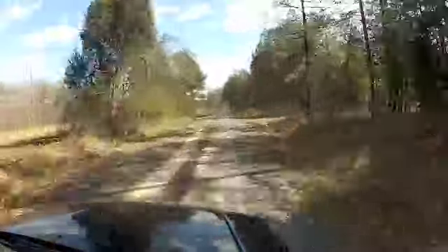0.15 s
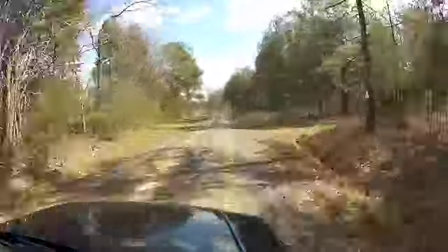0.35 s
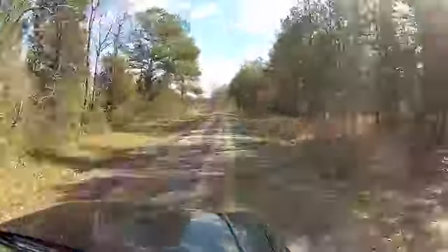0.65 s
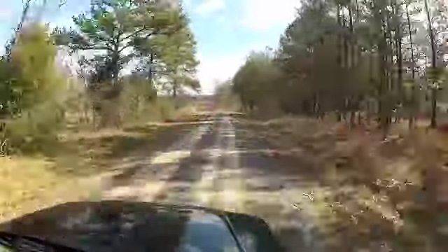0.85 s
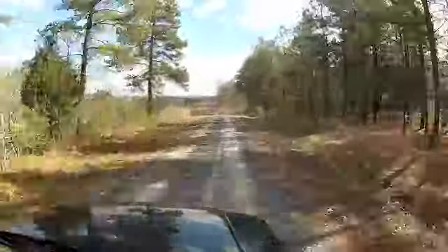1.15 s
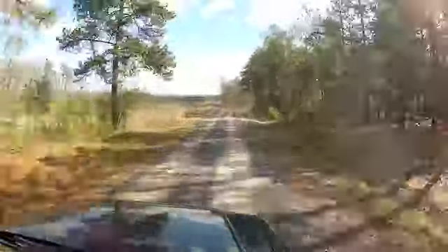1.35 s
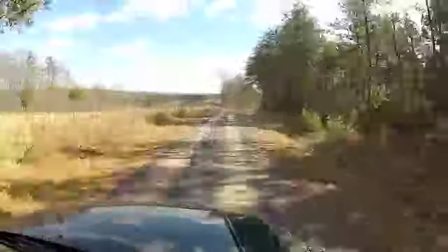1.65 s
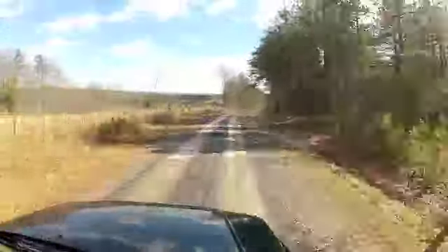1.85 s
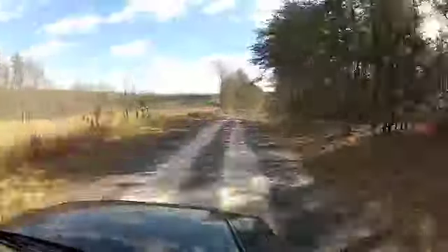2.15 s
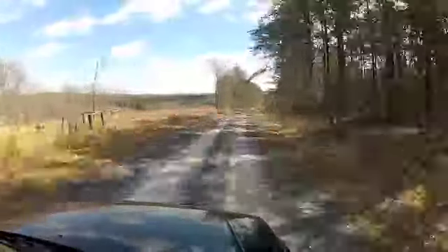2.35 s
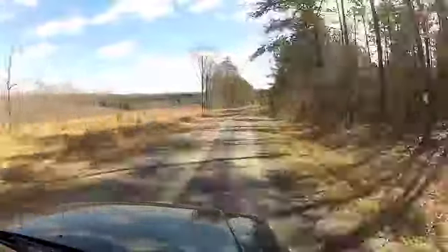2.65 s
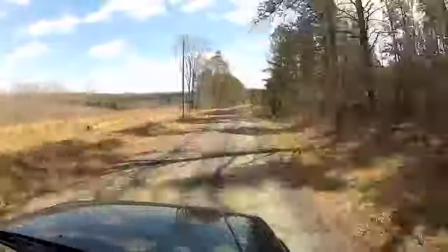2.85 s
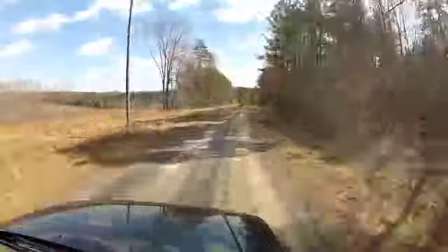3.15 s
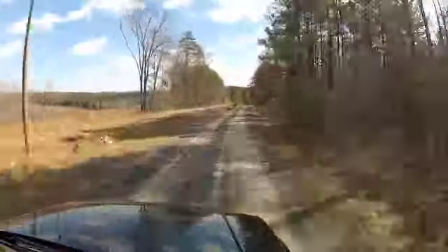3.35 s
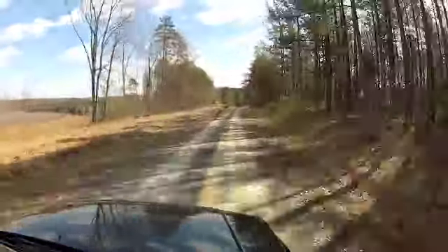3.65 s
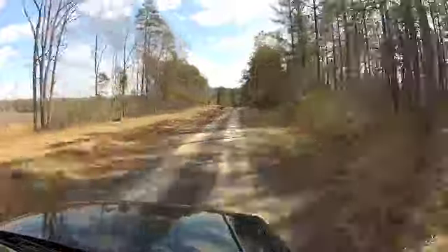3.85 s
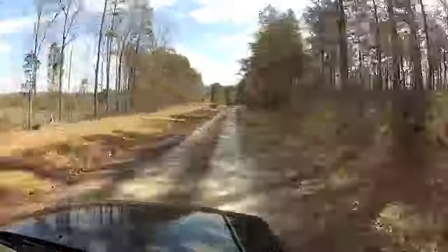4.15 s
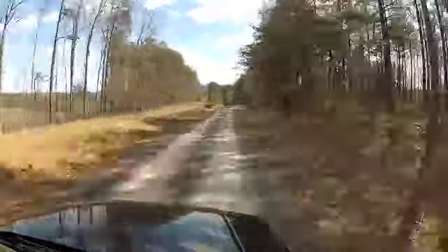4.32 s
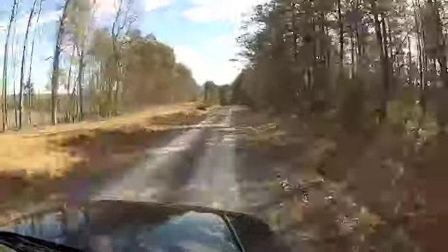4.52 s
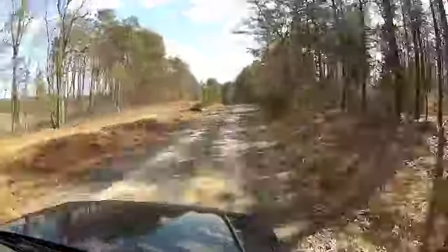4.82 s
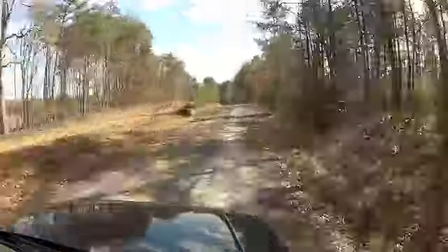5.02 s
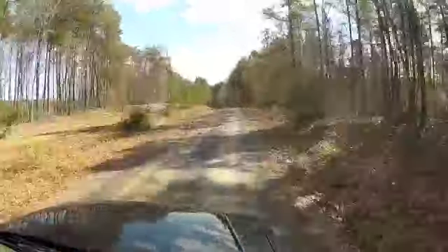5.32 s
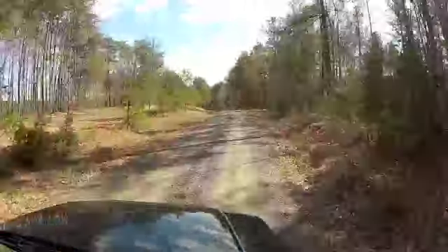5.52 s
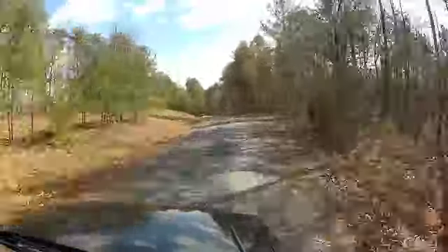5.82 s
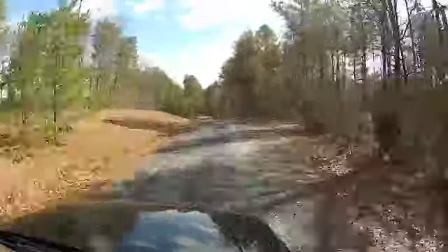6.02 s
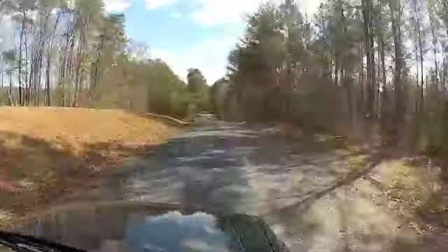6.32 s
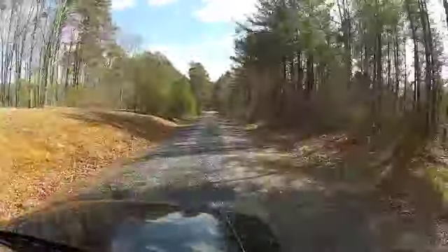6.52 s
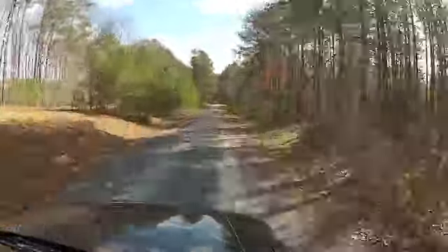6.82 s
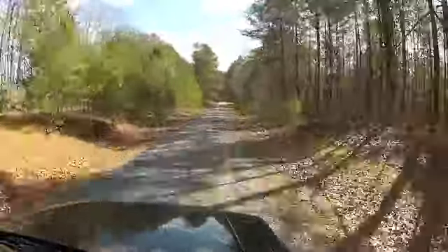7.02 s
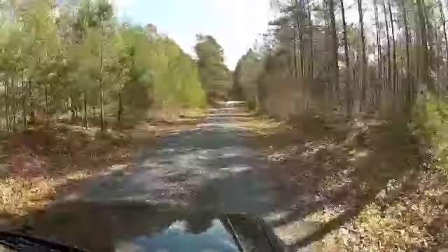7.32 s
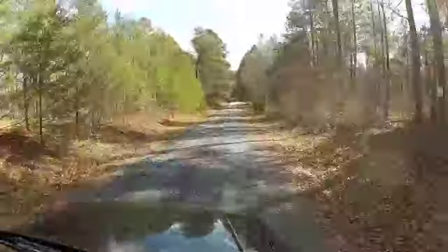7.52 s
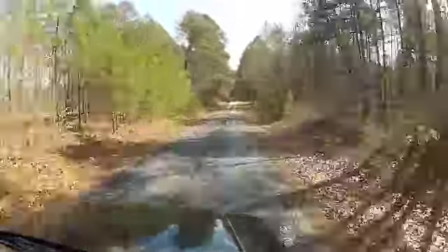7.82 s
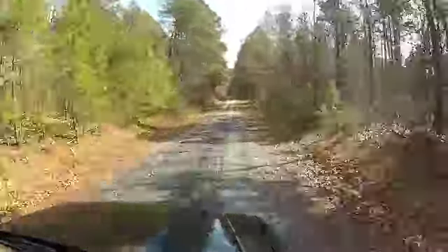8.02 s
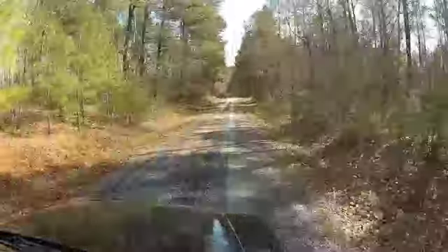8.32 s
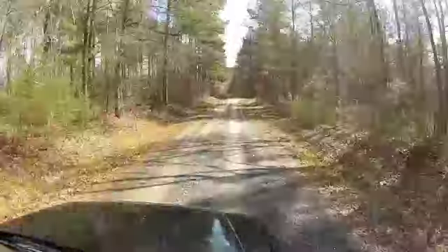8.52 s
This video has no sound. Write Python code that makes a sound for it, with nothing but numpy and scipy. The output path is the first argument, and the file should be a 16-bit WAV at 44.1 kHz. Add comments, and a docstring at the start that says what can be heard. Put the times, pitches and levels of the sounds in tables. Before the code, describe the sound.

A car drives steadily along a gravel forest road, heard by a microphone in a closed housing on its roof. Throughout, the case gives a hollow, boxy, uneven rumble, over low engine noise, a roof boom that swells and dips, a faint panel drone and tyre roar. A bright airstream hiss flutters above, with brief puffs and lulls. Around 1 s a soft jolt thumps, another near 1.7 s; fine grit ticks are clearest from 1.5 to 3 s. Duller bumps come at 3.1 and 3.6 s. At 4.4 s a stronger double thud leads into a rougher swell, easing around 5.5 s. From 5.8 s the shaking rises again and stays heavy, with bumps near 6.3 s. At about 7.6 s two jolts land, the second with a short, hard mount knock. More thuds cluster from 8.1 to 8.4 s, and the drive continues to the end at 8.7 s.

```python
"""A microphone in a closed housing rides on the roof of a car along a gravel forest road.
Throughout, band-shaped noise through resonances gives the ringing housing, booming roof, engine, panels,
tyres and hissing airstream; decaying tone bursts give the grit ticks, densest in level near 1.6 s and 3 s.
From about 1 s bumps jolt the housing, struck as sums of decaying modes, and near 7.7 s the mount knocks once."""
import sys
import numpy as np
from scipy import signal
from scipy.fft import rfft, irfft, next_fast_len
from scipy.io import wavfile
from scipy.ndimage import uniform_filter1d, map_coordinates

SR = 44100
rng = np.random.default_rng(int(sys.argv[2]) if len(sys.argv) > 2 else 0)


def master_out(mix):
    """Clip the mix to full scale and print it as 16-bit PCM to the path in sys.argv[1]."""
    frames = np.transpose(np.atleast_2d(mix))
    ceiling = np.clip(frames, -1, 1)
    pcm = np.round(ceiling * 32767).astype(np.int16)
    wavfile.write(sys.argv[1], SR, pcm)


N = 382332

# Roughness of the road as felt in the housing. Each row: time in seconds, shaking in dB.
ROAD_SHAKING = [(0, -24.5), (.5, -25.5), (.75, -19.5), (.95, -21.5), (1.2, -25.5), (1.6, -24.5),
                (2.0, -26.5), (3.05, -26.5), (3.2, -24.5), (3.55, -21), (3.8, -24.5), (4.34, -23),
                (4.4, -19.5), (4.58, -15), (4.9, -18.5), (5.25, -20), (5.52, -25), (5.75, -21),
                (5.95, -15.5), (6.5, -16), (7.0, -17), (7.45, -18.5), (7.6, -15.5), (8.2, -17.5),
                (8.67, -19)]
# Strength of the airstream. Each row: time in seconds, hiss level in dB before puffs and gusting.
WIND_STRENGTH = [(0, -37), (.4, -35.5), (.55, -41), (.8, -39), (1.0, -35), (1.2, -41.5), (1.35, -37),
                 (1.5, -39.5), (1.9, -37.5), (2.3, -40.5), (2.55, -41.5), (2.8, -39.5), (3.1, -41),
                 (3.5, -41.5), (3.78, -45), (3.86, -38.5), (4.5, -35), (4.9, -36.5), (5.1, -40.5),
                 (5.45, -41), (5.6, -44), (6.0, -40), (6.3, -41.5), (6.45, -39), (6.75, -41), (7.4, -38),
                 (8.0, -41), (8.15, -37), (8.67, -35)]
# Short puffs and lulls of the airstream. Each row: middle in seconds, length in seconds, change in dB.
WIND_PUFFS = [(.33, 0.07, 3), (.38, 0.048, -5), (.9, .04, 1), (1.19, .06, 1.5), (1.405, 0.012, -9),
              (1.45, 0.014, -9), (1.5, 0.059, -5), (1.575, .02, -4), (1.88, .08, 1.5), (2.08, .05, -2),
              (2.37, 0.032, -3), (2.425, 0.039, 3.5), (2.53, 0.099, -4.5), (2.62, 0.028, -1),
              (2.86, .04, -5.5), (2.94, 0.03, -3.5), (3.14, 0.038, -9), (3.3, 0.048, -8), (3.49, .07, 4),
              (3.67, .06, -5), (3.8, 0.046, -1.5), (5.48, 0.12, 3), (5.53, 0.047, -3), (5.62, 0.067, -3),
              (5.89, 0.09, -3), (6.33, 0.097, -4), (6.67, 0.058, 2.5), (6.76, 0.061, 4.5), (7.48, 0.027, 4),
              (8.05, 0.043, -3)]
# Modes of the housing walls. Each row: centre in Hz, width in Hz, relative level in dB.
WALL_MODES = [(367.7, 54, 3), (446, 50, 2), (527, 58, -5.5), (579, 82, -8), (683, 80, -13)]
# Mode of the housing lid. Each row: centre in Hz, width in Hz, relative level in dB.
LID_MODES = [(484.1, 27, 0)]
# Middle modes of the microphone port. Each row: centre in Hz, width in Hz, relative level in dB.
SPRAY_MODES = [(7010, 660, 0), (8630, 930, -1.5), (9970, 1100, -6)]
# Spectrum of what drives the housing. Each row: frequency in Hz, level in dB.
ROAD_SPECTRUM = [(100, -47), (220, -7), (550, -1.5), (750, -10.5), (1000, -27), (2000, -67)]

REFERENCE_SHAKE_DB, REFERENCE_HISS_DB = -21, -39
# dB at reference hiss, dB per dB of hiss, per dB of puff or lull, per dB of brightness
SPRAY_LAW = (-44, 1.2, 1.16, 0.85)


def amp(db):
    """Logarithmic level: 20 dB is a factor of ten in amplitude."""
    return 10 ** (np.asarray(db) / 20)


def unit(x):
    """Root-mean-square normalization: the signal is scaled to rms 1."""
    return x / np.sqrt(np.mean(x ** 2) + 1e-20)


def along(points, hz):
    """Spectral envelope: gain from (Hz, dB) points joined on a logarithmic frequency axis."""
    point_hz, point_db = np.transpose(points)
    return amp(np.interp(np.log(hz + 1), np.log(point_hz + 1), point_db))


def curves(rows):
    """Linear interpolation in time: one value per sample for each column after the time."""
    seconds, *columns = np.transpose(rows)
    return [np.interp(np.arange(N) / SR, seconds, column) for column in columns]


def wobble(rate):
    """Band-limited random modulation: a smooth curve through `rate` random knots a second."""
    knots = rng.standard_normal(int(N * rate / SR) + 4)
    return map_coordinates(knots, [np.arange(N) * rate / SR])


def filtered(x, response):
    """Linear filtering: the spectrum of x is multiplied by a response of frequency."""
    m = next_fast_len(N + SR // 2)
    return irfft(rfft(x, m) * response(np.fft.rfftfreq(m, 1 / SR)), m)[..., :N]


def ringing(modes, hz, steep):
    """Incoherent superposition: powers of resonances add; steep > 1 darkens the valleys between them."""
    power = 0
    for centre, width, db in modes:
        resonance = np.abs(hz * width / (centre * centre - hz * hz + 1j * hz * width))
        power = power + (amp(db) * resonance ** steep) ** 2
    return np.sqrt(power)


def rush(response, patchy_db, flutter_db=0, even=.1):
    """Filtered noise of rms 1, patchy in time and frequency, its level steadied over `even` seconds."""
    spectrum = signal.stft(rng.standard_normal(N + 512), nperseg=512)[2]
    field = rng.standard_normal(spectrum.shape)
    for axis in (0, 1):
        field = uniform_filter1d(field, size=8, axis=axis)
    patchy = signal.istft(spectrum * amp(patchy_db * unit(field)), nperseg=512)[1][:N]
    noise = filtered(patchy * amp(flutter_db), response)
    span = max(round(even * SR / 2), 1)
    power = uniform_filter1d(uniform_filter1d(noise ** 2, span), span)
    return unit(noise / np.sqrt(np.abs(power) + 0.43 * np.mean(power)))


def struck(s, peak_db, modes, attack):
    """Impulse excitation: modes (Hz, dB, t60 in s) swell over the attack (s) and decay exponentially."""
    out, t = np.zeros(N + SR), np.arange(SR // 4) / SR
    ring = sum(amp(db - 60 * t / t60) * np.sin(2 * np.pi * hz * t) for hz, db, t60 in modes)
    ring = ring * (1 - np.exp(-(t / attack) ** 2))
    out[round(s * SR):][:len(t)] = amp(peak_db) * ring / np.abs(ring).max()
    return out[:N]


def swells(rows):
    """Gaussian envelopes: bell-shaped changes in dB, summed."""
    t = np.arange(N) / SR
    return sum(db * np.exp(-(2 * (t - middle) / length) ** 2) for middle, length, db in rows)


def shaken(law):
    """Power law of excitation: level follows the road; law is (dB at reference shake, dB per dB)."""
    return law[0] + law[1] * (curves(ROAD_SHAKING)[0] - REFERENCE_SHAKE_DB)


def blown(law):
    """Power law of flow noise: level in dB follows the airstream, its puffs and lulls and its brightness."""
    # Brightness of the airstream. Each row: time in seconds, gain in dB before the law's factor.
    brightness = [(0, 2.5), (.45, 2), (.75, 0.5), (1.0, -0.5), (1.9, -2), (2.4, -0.5), (2.8, -1),
                  (3.25, -3.5), (3.6, 1), (3.95, 1), (4.7, -0.5), (5.5, 1), (6.0, 1), (7.5, -1), (8.0, 2.5),
                  (8.67, 1.5)]
    from_hiss = law[1] * (curves(WIND_STRENGTH)[0] - REFERENCE_HISS_DB)
    return law[0] + from_hiss + law[2] * swells(WIND_PUFFS) + law[3] * curves(brightness)[0]


def housing():
    """Forced vibration: stones under the wheels shake the mount in lumps; walls, base and lid resonate."""
    # Modes of the base. Each row: centre in Hz, width in Hz, relative level in dB.
    base_modes = [(239, 12.4, -3.5), (269, 12, -5), (330.5, 33, 1)]
    # Lean of the ring to the lid rather than the base. Each row: time in seconds, lean in dB.
    lid_lean = [(0, -0.5), (.5, -3), (.65, 1), (1.0, -1), (1.4, 3.5), (2.0, 0.5), (2.5, 1.5), (2.85, -2),
                (3.2, 1), (3.6, 1), (4.1, 1.5), (4.6, 2), (4.85, -1.5), (5.4, 3), (5.8, -1.5), (6.4, 0),
                (7.0, 1), (7.3, -1), (7.6, 1.5), (8.05, -3.5), (8.67, 1.5)]
    lean_db, = curves(lid_lean)
    lumps_db = 0.2 * wobble(12) + .5 * wobble(30) + 1.1 * wobble(60)
    walls = rush(lambda hz: along(ROAD_SPECTRUM, hz) * ringing(WALL_MODES, hz, 1.23),
                 0.42, lumps_db, even=0.28)
    base = rush(lambda hz: along(ROAD_SPECTRUM, hz) * ringing(base_modes, hz, 1.32),
                0.52, lumps_db, even=0.68)
    lid = rush(lambda hz: ringing(LID_MODES, hz, 1.59), 0.27, lumps_db, even=0.45)
    walls_db = curves(ROAD_SHAKING)[0] - 3.5
    base_db = shaken((-32.5, 1.48)) - 1.15 * lean_db  # the base yields as the lid gains
    lid_db = shaken((-24.5, 1)) + lean_db
    return amp(walls_db) * walls + amp(base_db) * base + amp(lid_db) * lid


def roof_boom():
    """Single-mode resonance: one low roof mode booms, swells and dips, and grows with the rough road."""
    # Roof resonance. Each row: centre in Hz, width in Hz, relative level in dB.
    roof_modes = [(104, 8, 0)]
    # Swells and dips of the boom. Each row: middle in seconds, length in seconds, change in dB.
    boom_swells = [(.1, .3, -5), (.48, .14, -3), (.75, 0.43, 5), (1.25, 0.22, 5.5), (1.52, .18, 11),
                   (1.7, 0.19, 12.5), (2.05, 0.058, 9), (2.9, .1, -4), (3.02, .1, 10), (3.24, .16, 10),
                   (4.03, .1, 13), (4.2, 0.083, 10), (4.42, 0.15, 14), (5.0, .14, 4), (5.22, .1, -9),
                   (5.6, 0.13, 5), (6.08, 0.12, 8), (6.7, 0.46, 3), (7.48, .15, 9), (7.7, .15, 9.5),
                   (8.08, 0.12, 10.5), (8.3, 0.23, 10.5), (8.55, 0.19, 7)]
    boom = rush(lambda hz: ringing(roof_modes, hz, 1.46), .1, even=0.07)
    return amp(shaken((-41, 0.42)) + swells(boom_swells)) * boom


def engine():
    """Broadband low-frequency excitation: engine rumble that grows with the rough road."""
    # Rumble spectrum. Each row: frequency in Hz, level in dB.
    rumble_spectrum = [(25, -30), (45, -51), (65, -5), (130, 5.5), (200, -1.5), (300, 4), (500, -44.5)]
    return amp(shaken((-35.5, 0.84))) * rush(lambda hz: along(rumble_spectrum, hz), 0.13, even=0.43)


def panels():
    """Plate resonance: a body panel drones on one mode, growing slightly with the rough road."""
    # Body panel mode. Each row: centre in Hz, width in Hz, relative level in dB.
    panel_modes = [(737.5, 37, 0)]
    return amp(shaken((-45, 0.24))) * rush(lambda hz: ringing(panel_modes, hz, 1.08), 0.96, even=0.44)


def tyres():
    """Rolling noise: random excitation roars through the resonances of the tyres."""
    # Tyre resonances. Each row: centre in Hz, width in Hz, relative level in dB.
    tyre_modes = [(890, 39, -3), (1236, 76, 1), (1345, 105, -1.5), (1510, 210, -9.5), (1684, 62, -9)]
    # Tyre roar. Each row: time in seconds, level in dB.
    roar_level = [(0, -45), (.3, -42), (.6, -46.5), (.9, -44), (2.2, -45.5), (3.2, -44), (4.2, -42),
                  (4.6, -38), (5.1, -41), (5.55, -45), (6.0, -40), (6.4, -42), (7.7, -42.5), (8.2, -39.5),
                  (8.67, -42.5)]
    roar_db, = curves(roar_level)
    return amp(roar_db) * rush(lambda hz: ringing(tyre_modes, hz, 1.2), 1.0, even=0.5)


def airstream():
    """Flow noise: eddies and dust excite the microphone port; weak wind is gustier, lulls lose the top first."""
    # Port modes: main, top and low. Each row: centre in Hz, width in Hz, relative level in dB.
    hiss_modes = [(4933, 1840, -1.3), (5578, 690, 1.8)]
    top_modes = [(11170, 770, -5.5), (12300, 1100, -7), (13100, 600, -4), (13700, 650, 1.5),
                 (14800, 700, -5)]
    low_modes = [(2470, 2800, -4.5), (2794, 460, 6.5), (3250, 92, 2)]
    # Spectrum of what drives the spray. Each row: frequency in Hz, level in dB.
    dust_spectrum = [(5500, 2.5), (6800, 2.5), (10500, -1), (12000, -6), (15000, -24)]
    hiss_db, = curves(WIND_STRENGTH)
    # random gusting loses a share of 0.13 of its depth per dB of hiss
    gust_depth_db = np.clip(1 - 0.13 * (hiss_db - REFERENCE_HISS_DB), .2, 2)
    gusting_db = gust_depth_db * wobble(32)
    # one flutter moves all four bands
    flutter_db = 0.4 * wobble(28) + 0.91 * wobble(70) + 1.2 * wobble(250)
    hiss = rush(lambda hz: ringing(hiss_modes, hz, 3.08), 1.0, flutter_db, even=0.049)
    spray = rush(lambda hz: along(dust_spectrum, hz) * ringing(SPRAY_MODES, hz, 0.91),
                 1.3, 0.5 * flutter_db, even=0.18)
    top = rush(lambda hz: ringing(top_modes, hz, 1.5), 1.1, 1.3 * flutter_db, even=.11)
    low = rush(lambda hz: ringing(low_modes, hz, 1.2), 0.96, 0.34 * flutter_db, even=0.25)
    hiss = amp(hiss_db + swells(WIND_PUFFS) + gusting_db) * hiss
    spray = amp(blown(SPRAY_LAW) + 0.97 * gusting_db) * spray
    top = amp(blown((-50.5, 1.33, 1.6, 1.3)) + 0.65 * gusting_db) * top
    low = amp(blown((-50, 1.07, 0.57, 1.36)) + 0.13 * gusting_db) * low
    return hiss + spray + top + low


def grit():
    """Impact excitation: flung grit ticks near port modes; a shower of small ticks follows the spray."""
    # Clearest ticks. Each row: start in seconds, level in dB before the tick's envelope, frequency in Hz.
    clear_ticks = [(1.5065, -36, 7800), (1.537, -33, 10100), (1.549, -31, 10200), (1.600, -32, 9000),
                   (1.733, -35, 10000), (1.738, -37, 10000), (2.408, -31, 8550), (2.415, -39, 7100),
                   (2.468, -34, 7050), (2.570, -30, 7000), (2.643, -26, 7100), (2.655, -31, 9800),
                   (2.713, -35, 8250), (2.822, -33, 7050), (2.830, -33, 7050), (2.914, -35, 8290),
                   (2.981, -35, 8470), (3.004, -31, 8600), (5.827, -40, 8040), (6.765, -37, 7100)]
    # Loose grit. Each row: time in seconds, tick level in dB relative to the spray.
    loose_grit = [(0, -3), (1.3, 1), (1.6, 8.5), (2.2, 2), (2.5, 3), (2.85, 6), (3.05, 7), (3.4, -3),
                  (4.0, -6), (5.5, -12), (6.8, 3), (7.6, -7), (8.67, -7)]
    place, mode, detune, size = rng.random((1800, 4)).T
    chosen = (mode * len(SPRAY_MODES)).astype(int)
    centre, width, mode_db = np.transpose(SPRAY_MODES)[:, chosen]
    shower_db = (blown(SPRAY_LAW) + curves(loose_grit)[0])[(place * N).astype(int)]
    # exponentially distributed sizes in dB: a few ticks stand out
    shower_db = shower_db + 0.51 * mode_db + 1.5 - 2.0 * np.log(1 - size)
    shower_hz = centre + 0.98 * width * (detune - .5)
    shower = np.transpose([place * N / SR, shower_db, shower_hz])
    start, db, hz = np.concatenate([shower, clear_ticks]).T[..., None]
    t = np.arange(SR // 100) / SR
    envelope = t / 0.0029 * np.exp(1 - t / 0.0013)  # soft start, peak 0.45 after 1.3 ms
    ticks = amp(db) * envelope * np.sin(2 * np.pi * hz * t)
    at = (start * SR).astype(int) + np.arange(len(t))
    return np.bincount(at.ravel(), ticks.ravel(), minlength=N + SR)[:N]


def jolts():
    """Modal excitation: each bump rings most strongly the housing modes nearest its centre frequency."""
    # Bumps. Each row: start in seconds, peak in dB, centre of the blow in Hz.
    bumps = [(0.955, -13, 480), (1.692, -9, 484), (3.144, -13, 477), (3.557, -11, 425), (4.368, -9, 377),
             (4.447, -4.5, 496), (5.802, -10, 455), (6.297, -9.5, 476), (6.314, -11, 450),
             (7.556, -6.5, 478), (7.662, -9, 500), (8.09, -10.5, 480), (8.179, -8, 483), (8.339, -6.5, 566),
             (8.433, -9.5, 494)]

    def near(blow_hz):
        """Modal weighting: level falls with squared distance in octaves, decay time with mode width."""
        return [(hz, -250 * np.log2(hz / blow_hz) ** 2, 1.8 / width)
                for hz, width, _ in WALL_MODES + LID_MODES]

    return sum(struck(s, db, near(hz), attack=0.0069) for s, db, hz in bumps)


def mount_knock():
    """Hard contact: a very short attack rings the high, quickly damped modes of the clamp."""
    # Mount contact. Each row: start in seconds, peak in dB before a fixed 2.5 dB gain.
    contacts = [(7.665, -27)]
    # Modes of the clamp. Each row: frequency in Hz, relative level in dB, 60 dB decay time in seconds.
    clamp_modes = [(1830, 1, 0.014), (2250, -1, .01), (2700, 0, 0.014), (3280, 5, 0.006), (4080, 2, 0.012)]
    return sum(struck(s, db + 2.5, clamp_modes, attack=.0002) for s, db in contacts)


def scene():
    """Linear superposition: all sources add at one microphone."""
    car = roof_boom() + engine() + panels() + tyres()
    return (housing() + car + airstream() + grit() + jolts() + mount_knock())[None]


def record(dry):
    """Saturation and filtering: the input rounds off tall swings, the capsule colours, the band ends."""
    # Colour of the enclosed capsule. Each row: frequency in Hz, gain in dB.
    capsule = [(35, 1), (60, 0), (11600, 0), (12200, -4), (12900, -1.5), (15000, -1.5), (15400, -4),
               (15700, -3)]
    band_limit_hz = 15700
    soft = dry / (1 + np.abs(dry / .7) ** 6) ** (1 / 6)  # swings approach 0.7 at most
    return filtered(soft, lambda hz: along(capsule, hz) * (hz < band_limit_hz))


dry = scene()
out = record(dry)
master_out(out)
```